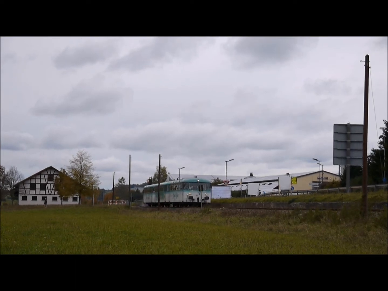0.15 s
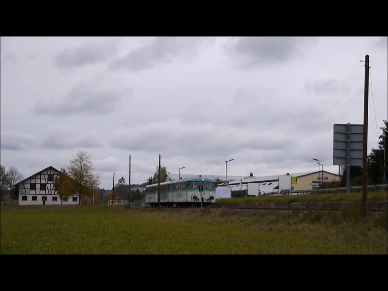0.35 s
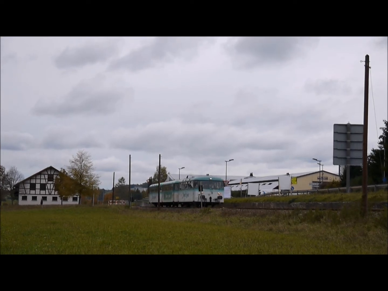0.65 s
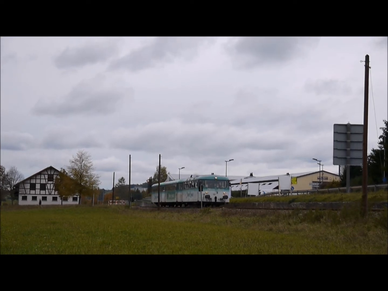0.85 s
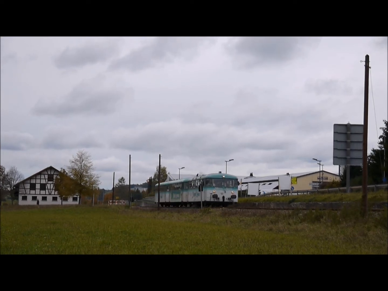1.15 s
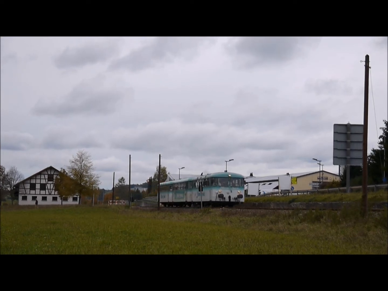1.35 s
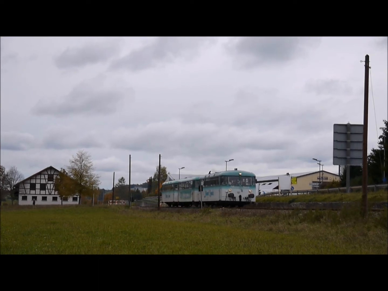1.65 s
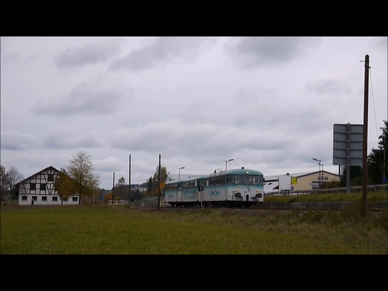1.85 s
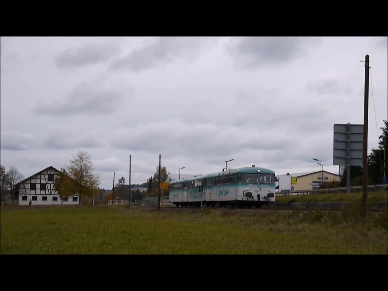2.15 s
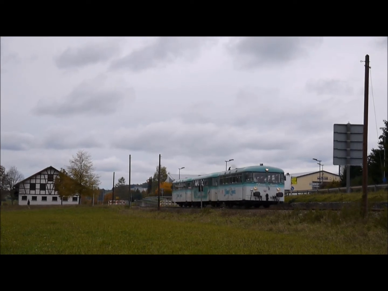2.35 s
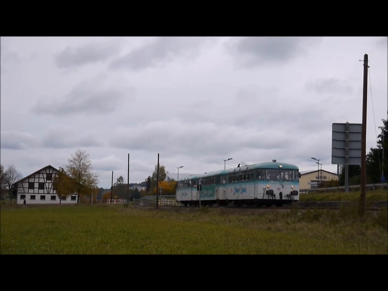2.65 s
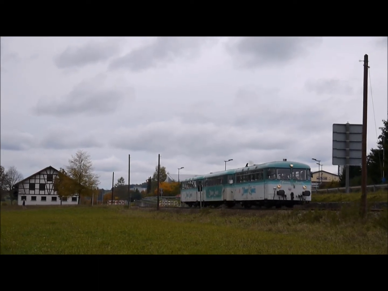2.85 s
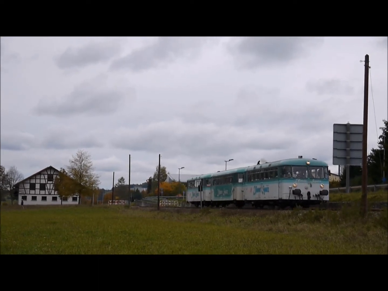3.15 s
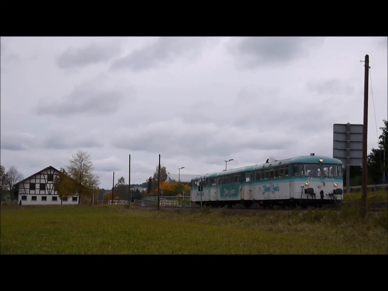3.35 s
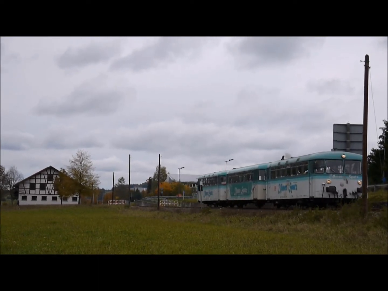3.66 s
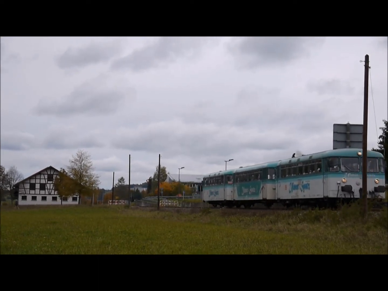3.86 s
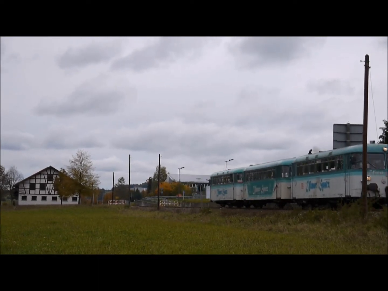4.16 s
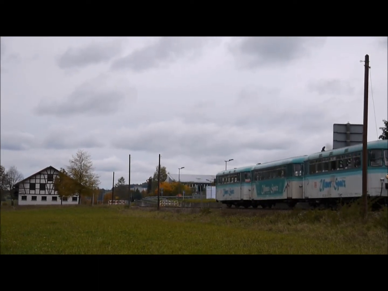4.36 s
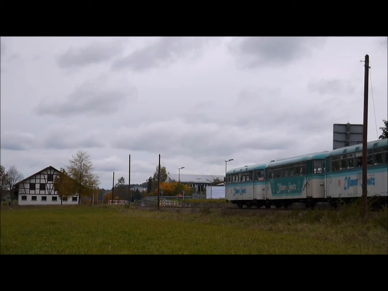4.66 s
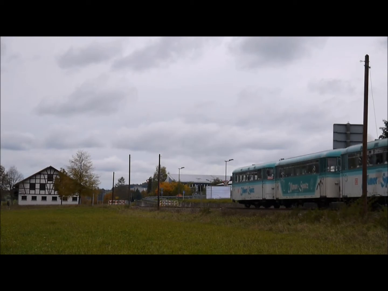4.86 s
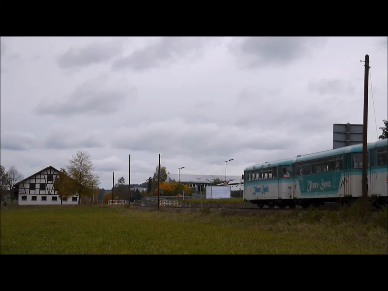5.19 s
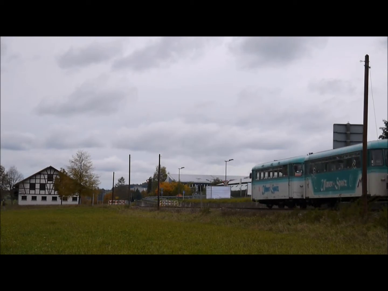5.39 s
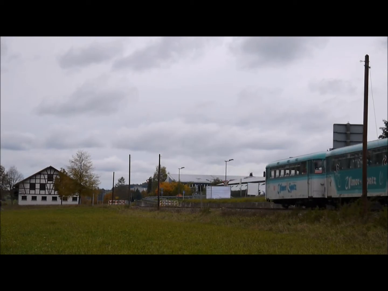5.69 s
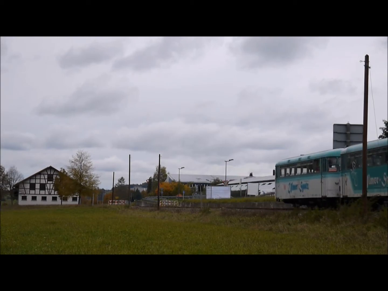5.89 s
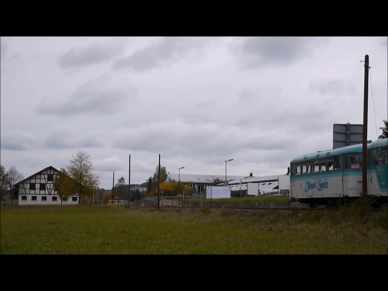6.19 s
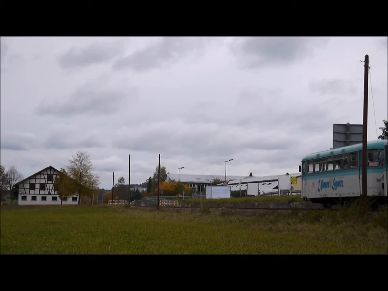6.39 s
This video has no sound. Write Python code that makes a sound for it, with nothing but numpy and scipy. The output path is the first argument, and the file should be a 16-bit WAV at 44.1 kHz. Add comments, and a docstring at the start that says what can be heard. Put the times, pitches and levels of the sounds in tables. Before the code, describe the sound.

A two-car diesel railbus comes closer on a rural line. Its soft drone is cut by a single reedy horn toot of about half a second, with airy hiss and a grainy echo tail. Automatic gain dips, then slowly lets the engine and wheels back. Rail joints clack increasingly sharply, rails hum and ring, and thin metal squeaks appear near the end. Mono, trackside field microphone.

```python
"""Engine drone and wheel roar are heard first, swelling as a diesel railbus nears over open fields.
One short air-horn blast, a stack of overtones plus rushing air, comes back from houses and sheds.
Two slightly detuned engines beat over a noise rumble; the wheels are shaped noise and ringing rails.
Noise bursts clack at the rail joints, and thin tones squeak.
A fast gain control ducks everything under the horn and lets go slowly."""
import sys
import numpy as np
from scipy import signal
from scipy.io import wavfile
from scipy.ndimage import uniform_filter1d

SR = 44100
rng = np.random.default_rng(int(sys.argv[2]) if len(sys.argv) > 2 else 0)


def bounce(signal):
    """Save signal as a 16-bit WAV file at the path given by the first command-line argument."""
    frames = np.transpose(np.atleast_2d(signal))
    limited = np.clip(frames, -1, 1)
    pcm = np.round(limited * 32767).astype(np.int16)
    wavfile.write(sys.argv[1], SR, pcm)


N = 287973  # length in samples

# Horn overtones on the main note: multiple of the pitch, level/dB
HORN_OVERTONES = [(1, -18), (2, 0), (3, -6), (4, -15), (5, -17), (6, -22), (7, -17), (8, -36), (9, -26),
                  (10, -32), (11, -32), (12, -37), (13, -45), (14, -43), (15, -58), (16, -56)]
# Low note of the emptying horn: multiple of a third of the pitch, level/dB
HORN_LOW_NOTE = [(2, -5), (4, -8), (5, -0.5), (7, -14), (8, -14)]
# Single echoes; walls behind the moving horn hear it flatter: delay/s, pitch factor, level/dB
WALL_ECHOES = [(.045, 1.0, -21), (.3, .93, -34), (.27, .998, -18), (.6, .925, -36), (1.1, .998, -38),
               (1.3, .998, -40), (1.5, .997, -44)]
# Crowds of small reflectors: pitch factor, level/dB
SCATTERED_ECHOES = [(.998, -19), (.985, -23), (.972, -23), (.95, -26)]
# Decay of the scattered return: f/Hz, t60/s
YARD_DECAY = [(400, 0.83), (900, 1.35), (1700, 0.79), (3000, 0.71), (6000, 0.55), (12000, 0.6)]
# Engine tones over time, per engine before the second is added: t/s, firing tone level/dB, second order level/dB
ENGINE_TONES = [(0, -49.5, -47), (2, -44.5, -45), (2.7, -40.5, -42), (3.6, -38, -34), (4.6, -33, -38.5),
                (5.7, -31, -34), (6.5, -49.5, -34.5)]
# Lines from uneven cylinders: multiple of the full cycle of six firings, level/dB when near
CYCLE_LINES = [(5, -47), (7, -70), (9, -39.5), (10, -38), (11, -45), (13, -47), (15, -41), (18, -42.5),
               (34, -43)]
# Relative kick of each cylinder in firing order: level/dB
CYLINDER_KICKS = [1, -2, 11, -7, 10, -8]
# Shape of the engine rumble: f/Hz, relative level/dB per Hz
RUMBLE_SHAPE = [(12, -48), (20, -29), (53, -34), (68, -3), (81, -0.5), (113, 1), (177, 10.5), (225, -1),
                (259, -8.5), (309, -25), (420, -7.5), (550, -36), (920, -120)]
# Wheels on rails: t/s, roar level/dB (3-9 kHz), nearness 0-1, rail ring level/dB before rolling() widens its swing
WHEELS = [(0, -53.5, 0.38, -58), (1.05, -51, 0.42, -59), (2.3, -46.5, 0.44, -39), (3.1, -41, 0.56, -48),
          (3.8, -38, 0.69, -35.5), (4.5, -36, 0.58, -47), (5.4, -33.5, 0.66, -29.5),
          (5.9, -34, 0.71, -26.5), (6.25, -34, 0.76, -23), (6.53, -32.5, 0.7, -24)]
# Shape of the distant wheel roar: f/Hz, relative level/dB per Hz
FAR_ROAR = [(160, -42), (280, -23), (488, -2), (530, -7), (694, -11.5), (908, -11), (1090, -12),
            (1170, -14.5), (3050, -23.5), (4410, -33), (6600, -36), (8350, -48), (15600, -71.5)]
# Shape of the close wheel roar: f/Hz, relative level/dB per Hz
NEAR_ROAR = [(160, -36), (280, 11.5), (366, -49), (488, -8), (577, -9), (1000, -5), (1430, -9), (1640, -4),
             (2710, -6), (8070, -15.5), (10200, -8.5), (13100, -31.5), (15600, -42)]
# Comb from the bounce off the ground: t/s, spacing of the peaks f/Hz, full depth level/dB
GROUND_COMB = [(0, 1780, 1), (1, 1570, 1.4), (2, 1500, 1.2), (2.45, 1620, 2), (2.85, 1690, 2.4),
               (3.3, 1620, 2), (3.5, 1600, 0)]
# Resonances of the rails: f/Hz, width f/Hz, relative level/dB
RAIL_MODES = [(253.2, 7.4, 1.5), (367, 55, -8.5), (471, 5.5, -23), (872, 100, 2.5), (1029, 40, 3.5),
              (1260, 270, 2.5), (1680, 170, 0)]
# Rail joints: t/s, burst level/dB before a 12 dB cut, knock level/dB before the decay
JOINT_CLACKS = [(2.595, -31, -39), (3.242, -16, -30), (3.7, -20.5, -33), (4.26, -17.5, -39.5),
                (4.7094, -15.5, -33), (5.2898, -13.5, -30), (5.3575, -4, -44), (5.4892, -22, -28.5),
                (5.8094, -13, -30), (6.2394, -19, -34), (6.3939, -10.5, -42)]
# Metal squeaks: t/s, peak level/dB, f/Hz
METAL_SQUEAKS = [(3.6702, -38, 5250), (6.0364, -33, 5150), (6.2, -33, 5400), (6.486, -27, 5170)]

# Air horn: the valve opens, holds, the pressure sags and the air runs out
BLAST_S, SAG_S, CLOSE_S, END_S = 1.082, 1.40, 1.54, 1.74
ATTACK_S, SETTLE_S, SETTLE_DB = .0095, .016, -7.5  # quick rise, then the last few dB
HOLD_DB, SAG_DB_PER_S, RELEASE_DB = 2, -35, -31
HOLD_HZ, OVERSHOOT_HZ, OVERSHOOT_S = 861.5, 75, .017  # the reed starts sharp and settles
BEND_HZ, BEND_MID_S, BEND_S = 51, 1.46, .06  # it bends up as the pressure sags
LOW_SHARE, LOW_RISE_S = .9, .04  # share of the low note once the valve closes
DIP_S, DIP_WIDTH_S, DIP_DB = 1.345, .028, -11  # the second tone dips briefly
POP_DB, POP_S = 12, .012  # the lowest tone pops as the valve opens
# Engines
FIRING_HZ, DROP_HZ_PER_S = 89.25, .45  # the firing rate sinks as the cars turn broadside
BEAT_PER_S, BEAT_QUIET_S, BEAT_SHARE = .905, 4.17, .6  # a second engine runs slightly apart and beats
RUMBLE_DB, RUMBLE_FOLLOWS = -28.5, 0.61  # level when close, and its dB per dB of wheel roar
# Metal
CLACK_HZ, CLACK_T60_S = 2230, 0.14
SQUEAK_S = 0.025
EDGE_HZ = 15700  # upper band limit


def blast(t):
    """Reed under changing air pressure: pitch, level, low-note share and second-tone dip at times t."""
    since = np.maximum(t - BLAST_S, 0)
    overshoot_hz = OVERSHOOT_HZ * np.exp(-since / OVERSHOOT_S)
    bend_hz = BEND_HZ * (1 + np.tanh((t - BEND_MID_S) / BEND_S)) / 2
    attack_db = -40 * (1 - np.minimum(since / ATTACK_S, 1) ** 2)
    settle_db = SETTLE_DB * np.exp(-np.maximum(since - ATTACK_S, 0) / SETTLE_S)
    sag_db = SAG_DB_PER_S * np.clip(t - SAG_S, 0, END_S - SAG_S)
    closing = np.clip((t - CLOSE_S) / (END_S - CLOSE_S), 0, 1)
    level_db = HOLD_DB + attack_db + settle_db + sag_db + RELEASE_DB * closing ** 1.5
    low = LOW_SHARE * (1 - np.exp(-np.maximum(t - CLOSE_S, 0) / LOW_RISE_S))
    dip_db = DIP_DB * np.exp(-((t - DIP_S) / DIP_WIDTH_S) ** 2)
    return HOLD_HZ + overshoot_hz + bend_hz, level_db, low, dip_db


def horn(delay, factor, beam, dull_db, base_db, shimmer_db):
    """A reed drives the pipe on its third mode and falls to the first as the pressure drops."""
    t = BLAST_S + (np.arange(N) / SR - BLAST_S - delay) * factor  # a moving source stretches time
    hz, level_db, low, dip_db = blast(t)
    turns = 2 * np.pi * np.cumsum(hz * factor) / SR  # phase in radians
    rush_band = signal.butter(3, [1100, 7500], "bandpass", fs=SR, output="sos")
    out = gain_of(-22.5) * signal.sosfilt(rush_band, rng.standard_normal(N))  # air past the reed
    pop_db = beam * POP_DB * np.exp(-np.maximum(t - BLAST_S - ATTACK_S, 0) / POP_S)
    slack_db = .35 * np.maximum(-level_db, 0)  # a slack reed loses its overtones
    for k, db in HORN_OVERTONES:
        # moving air makes each overtone shimmer, the high ones more
        shimmer = np.minimum(k, 5) * np.tanh(wander(.04))
        tone_db = db - (dull_db + slack_db) * (k - 2)
        tone_db = tone_db + (base_db + pop_db) * (k == 1) + beam * dip_db * (k == 2)
        out += gain_of(tone_db + shimmer_db * shimmer) * np.sin(k * turns + .6 * k * k)
    for k, db in HORN_LOW_NOTE:
        low_db = db - 10 * (1 - beam) + 3 * np.tanh(wander(.015))
        out += low * gain_of(low_db) * np.sin(k * turns / 3)
    return out * gain_of(level_db) * (t > BLAST_S) * (t < END_S)


def wall_echoes():
    """Delayed, duller blasts off single walls; far walls blur more."""
    out = np.zeros(N)
    for delay, factor, db in WALL_ECHOES:
        echo = horn(delay, factor, 0, dull_db=3, base_db=-3, shimmer_db=1.5)
        out += gain_of(db) * smeared(echo, .6 * delay)
    return out


def scattered_echoes():
    """Crowds of small reflectors return the blast at several pitches as a sparse tail."""
    out = np.zeros(N)
    for factor, db in SCATTERED_ECHOES:
        # the horn beams its overtones ahead, so the sides get more of the lowest tone
        out += gain_of(db) * yard(horn(0, factor, 0, dull_db=.8, base_db=2, shimmer_db=1.5))
    return out


def smeared(x, t60):
    """An uneven wall returns many small copies within a short time."""
    t = np.arange(SR // 2) / SR
    taps = rng.standard_normal(len(t)) * gain_of(-60 * t / t60)
    return signal.fftconvolve(x, taps / np.linalg.norm(taps))[:N]


def yard(x):
    """Sparse returns of random sign from scattered buildings, each band dying at its own speed."""
    taps = np.zeros(3 * SR)
    at = np.arange(1200, 3 * SR - 60, 60)
    taps[at + rng.integers(0, 60, len(at))] = rng.choice([-1., 1.], len(at))
    hz, t, z = signal.stft(taps, SR, nperseg=256)
    decay = gain_of(-60 * t / read(YARD_DECAY, hz)[:, None])
    build_up = np.tanh(t / .25) ** 2
    tail = signal.istft(z * decay * build_up, SR, nperseg=256)[1]
    return signal.fftconvolve(x, tail / np.linalg.norm(tail))[:N]


def engine():
    """Firing orders of two engines waver and beat over a noise rumble; also returns the firing kicks."""
    t = np.arange(N) / SR
    first_db, second_db = curves(ENGINE_TONES, t)
    roar_db = curves(WHEELS, t)[0]
    near_db = RUMBLE_FOLLOWS * (roar_db - roar_db.max())
    hz = FIRING_HZ - DROP_HZ_PER_S * t
    turns = np.cumsum(hz * (1 + 0.00389 * wander(0.0898))) / SR  # firings so far
    # the firing tones are out of step at the quiet moment
    other = turns + BEAT_PER_S * (t - BEAT_QUIET_S) + .5
    out = np.zeros(N)
    for k, db in enumerate([first_db, second_db], start=1):
        pair = np.sin(2 * np.pi * k * turns) + BEAT_SHARE * np.sin(2 * np.pi * k * other)
        out += np.sqrt(2) * gain_of(db) * pair
    for k, db in CYCLE_LINES:
        line_db = db + 1.35 * near_db + 2.2 * wander(0.3)
        out += gain_of(line_db) * np.sin(2 * np.pi * k * turns / len(CYLINDER_KICKS))
    cylinder = turns.astype(int) % len(CYLINDER_KICKS)
    kick = np.array(gain_of(CYLINDER_KICKS))[cylinder] * np.exp(-(turns % 1))

    def colour(f, t):
        return read(RUMBLE_SHAPE, f) - 60 * (f > RUMBLE_SHAPE[-1][0]) + 0 * t

    rumble = noise(colour, patchy_db=.8, flicker_db=0.5)
    return out + gain_of(RUMBLE_DB + near_db) * evened(rumble), kick


def rolling(kick):
    """Wide roar that brightens as the cars come near, lightly chopped by the firings, and ringing rails."""
    roar_db, _, ring_db = curves(WHEELS, np.arange(N) / SR)

    def colour(f, t):
        near = np.clip(curves(WHEELS, t)[1], 0, 1)
        spacing_hz, depth_db = curves(GROUND_COMB, t)
        # the bounce off the ground combs the hiss
        comb_db = depth_db * np.cos(2 * np.pi * f / spacing_hz) * np.clip(f / 4000, 0, 1)
        blend_db = (1 - near) * read(FAR_ROAR, f) + near * read(NEAR_ROAR, f)
        return blend_db - 40 * (f < 260) + comb_db

    roar = noise(colour, patchy_db=1.0, flicker_db=.6) * (1 + .12 * kick)
    roar *= gain_of(roar_db) / band_rms(roar, 3000, 9000, .5)
    ring = np.zeros(N)
    for hz, width, db in RAIL_MODES:
        ring += gain_of(db) * evened(resonate(rng.standard_normal(N), hz, width))
    # the rails ring mostly when the wheels are close
    ring_db = ring_db + 0.62 * (ring_db - ring_db.max())
    flutter_db = 1.2 * wander(.04)
    return roar + gain_of(ring_db + 1.5 + flutter_db) * evened(mid_range(ring))


def joints():
    """Each wheel drops into a rail gap: a rattling burst round one colour, a bright tick and a low knock."""
    out, t = np.zeros(N), np.arange(6000) / SR
    envelope = gain_of(-60 * t / CLACK_T60_S) * np.tanh(t / 0.00058)
    for s, db, knock_db in JOINT_CLACKS:
        burst = rng.standard_normal(len(t))
        bright = evened(resonate(resonate(burst, 4500, 6000), 4500, 7000))
        tick = 1.1 * bright * np.exp(-t / 0.004)
        body = evened(resonate(resonate(burst, CLACK_HZ, 2900), CLACK_HZ, 3100))
        knock = gain_of(knock_db) * np.sin(2 * np.pi * 700 * t)
        add(out, s, envelope * (gain_of(db - 12.0) * (body + tick) + knock))
    return out


def squeaks():
    """Brief thin whistles of metal rubbing on metal."""
    out, t = np.zeros(N), np.arange(0, SQUEAK_S, 1 / SR)
    for s, db, hz in METAL_SQUEAKS:
        add(out, s, gain_of(db) * np.hanning(len(t)) * np.sin(2 * np.pi * hz * t))
    return out


def mid_range(x):
    """Band-pass from 150 Hz to 10.5 kHz, keeping the clacks and the rail ring in the middle range."""
    return signal.sosfilt(signal.butter(3, [150, 10500], "bandpass", fs=SR, output="sos"), x)


def noise(shape_db, patchy_db, flicker_db):
    """Random short-time spectra under shape_db(Hz, s), with drifting patches and wide flicker."""
    frames, hz = N // 256 + 5, np.fft.rfftfreq(1024, 1 / SR)[:, None]
    a, b, patches = rng.standard_normal((frames, 513, 3)).T
    patches = uniform_filter1d(uniform_filter1d(patches, size=12, axis=0), size=14, axis=1)
    flicker = evened(uniform_filter1d(rng.standard_normal(frames), size=8))
    shape = gain_of(shape_db(hz, np.arange(frames) * 256 / SR))
    motion = gain_of(patchy_db * evened(patches) + flicker_db * flicker)
    return signal.istft((a + 1j * b) * shape * motion, nperseg=1024, noverlap=768)[1][:N]


def wander(smooth_s):
    """Smoothed random drift of rms 1, drawn at 1000 steps a second."""
    size, steps = round(smooth_s * 1000), N * 1000 // SR + 2
    drift = uniform_filter1d(uniform_filter1d(rng.standard_normal(steps), size), size)
    return np.interp(np.arange(N) * 1000 / SR, np.arange(steps), evened(drift))


def resonate(x, hz, width):
    """One resonance of gain 1; a wider one dies sooner."""
    r = np.exp(-np.pi * width / SR)
    return 2 * signal.lfilter([1 - r], [1, -r * np.exp(2j * np.pi * hz / SR)], x).real


def band_rms(x, lo_hz, hi_hz, smooth_s):
    """Running rms of one band."""
    band = signal.sosfilt(signal.butter(4, [lo_hz, hi_hz], "bandpass", fs=SR, output="sos"), x)
    return np.sqrt(uniform_filter1d(band ** 2, round(smooth_s * SR)) + 1e-20)


def gain_of(db):
    """Amplitude factor of a level in dB."""
    return 10 ** (np.asarray(db) / 20)


def evened(x):
    """Scale to rms 1."""
    return x / np.sqrt(np.mean(x ** 2) + 1e-20)


def read(points, hz):
    """Value of a spectrum table on a log-frequency axis."""
    f, value = np.transpose(points)
    return np.interp(np.log(hz + 1), np.log(f + 1), value)


def curves(table, t):
    """Columns of a control table at times t."""
    s, *columns = np.transpose(table)
    return [np.interp(t, s, c) for c in columns]


def add(mix, s, sound):
    """Lay a sound into the mix at s seconds, cut at the end."""
    part = mix[round(s * SR):][:len(sound)]
    part += sound[:len(part)]


def scene():
    """Horn and its returns over engines, wheels, joints and squeaks."""
    direct = horn(0, 1, beam=1, dull_db=0, base_db=0, shimmer_db=.9)
    # fast random flutter makes the echoes grainy
    echoes = wall_echoes() * (1 + .12 * wander(.012))
    scattered = scattered_echoes() * (1 + .25 * wander(.003))
    drone, kick = engine()
    wheels = rolling(kick) + mid_range(joints()) + squeaks()
    return (direct + echoes + scattered + drone + wheels)[None]


def record(dry):
    """Gain control clamps down within milliseconds and lets go slowly; then the band limit."""
    power_db = 10 * np.log10(signal.lfilter([.004], [1, -.996], dry[0] ** 2) + 1e-12)
    fall_db = np.arange(N) * 33.0 / SR  # recovery at 33 dB a second
    held_db = np.maximum.accumulate(power_db + fall_db) - fall_db
    over_db = np.maximum(held_db + 17, 0)  # excess above -17 dB
    ducked = dry / gain_of(.92 * signal.lfilter([.012], [1, -.988], over_db))
    lowpass = signal.firwin(511, EDGE_HZ, window=("kaiser", 9), fs=SR)
    return signal.oaconvolve(ducked, lowpass[None], "same")


dry = scene()
out = record(dry)
bounce(out)
```